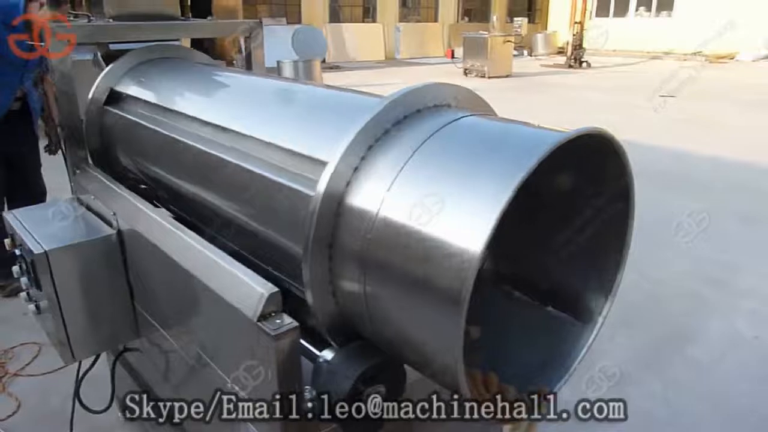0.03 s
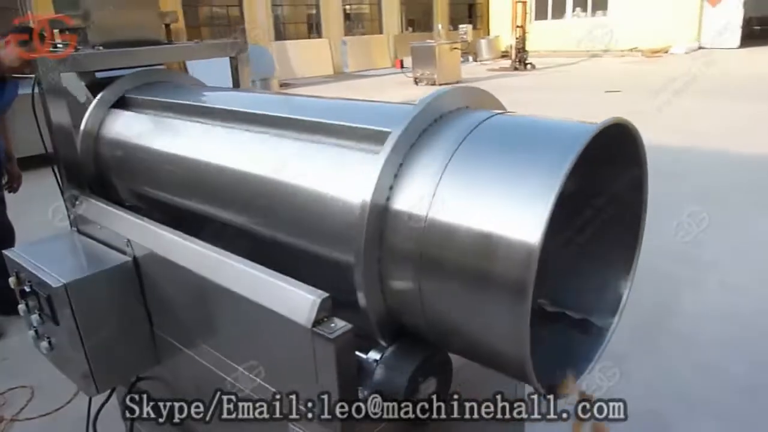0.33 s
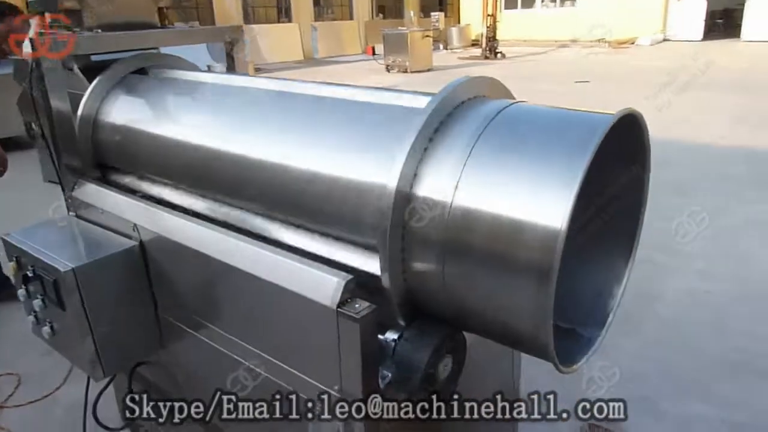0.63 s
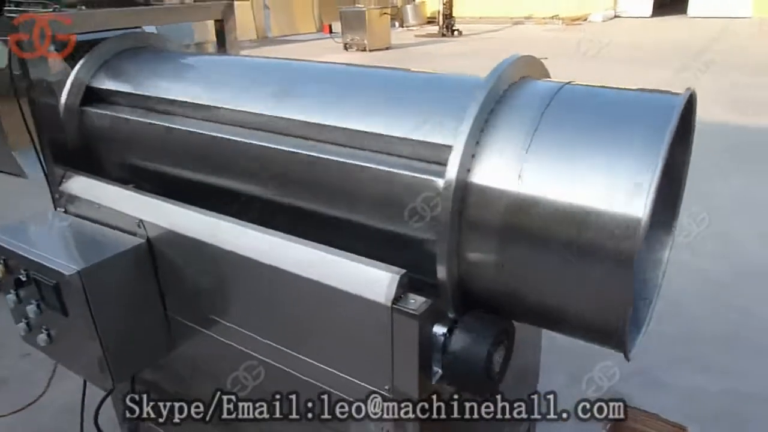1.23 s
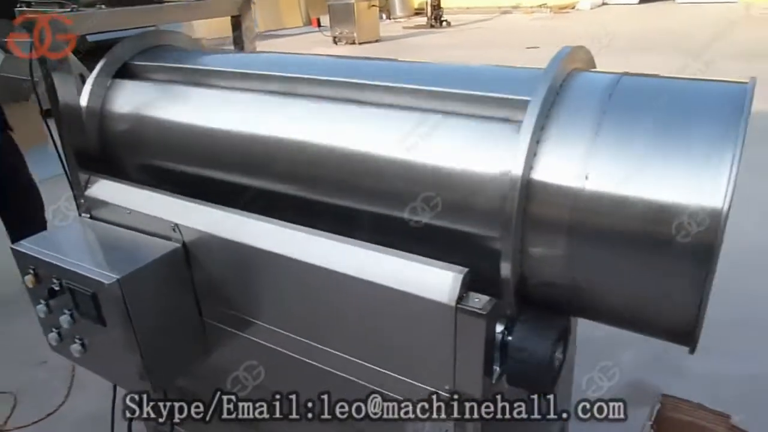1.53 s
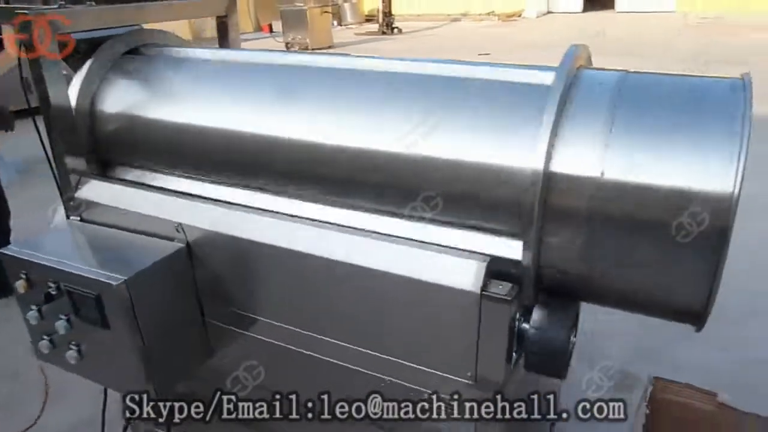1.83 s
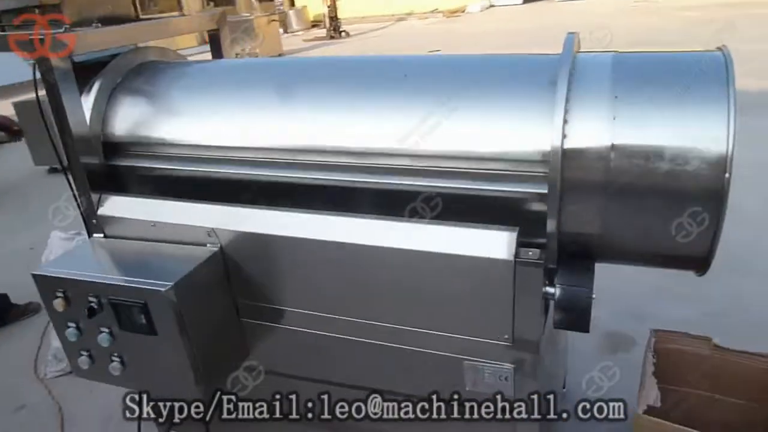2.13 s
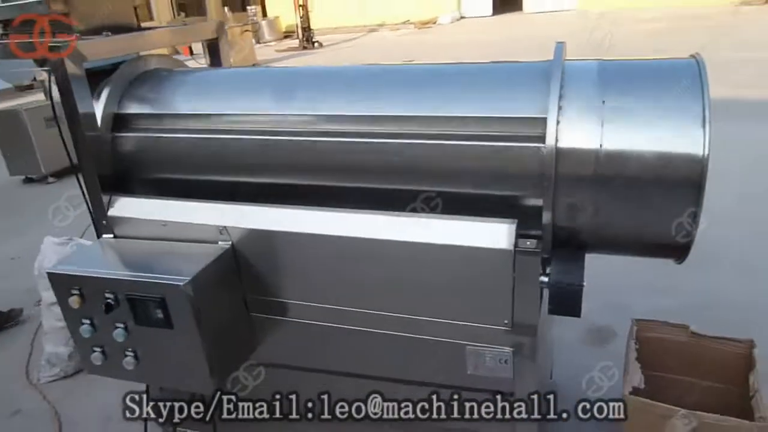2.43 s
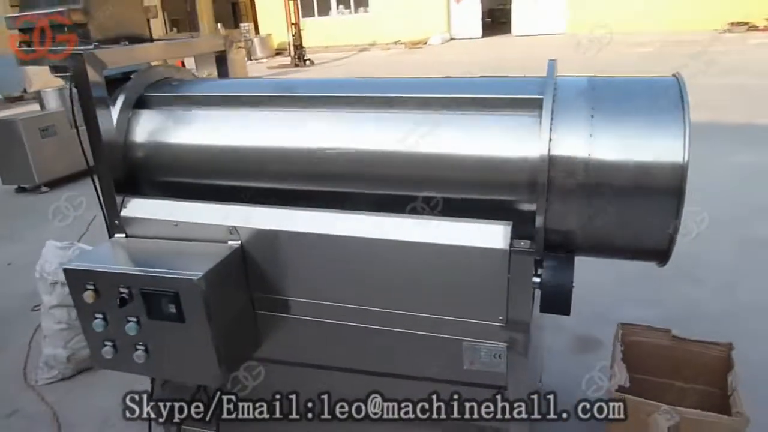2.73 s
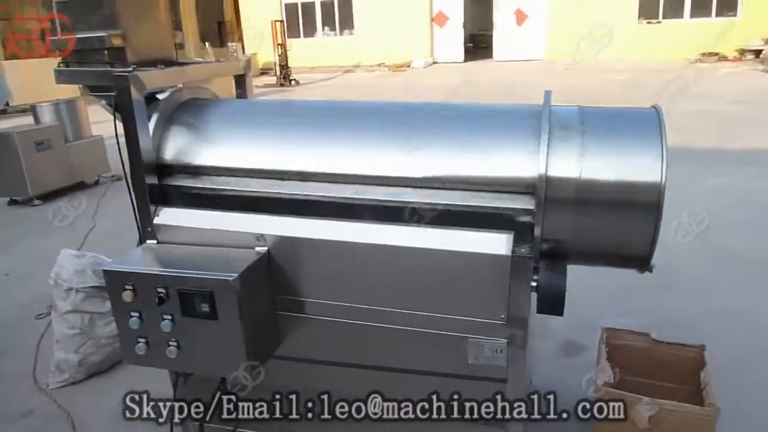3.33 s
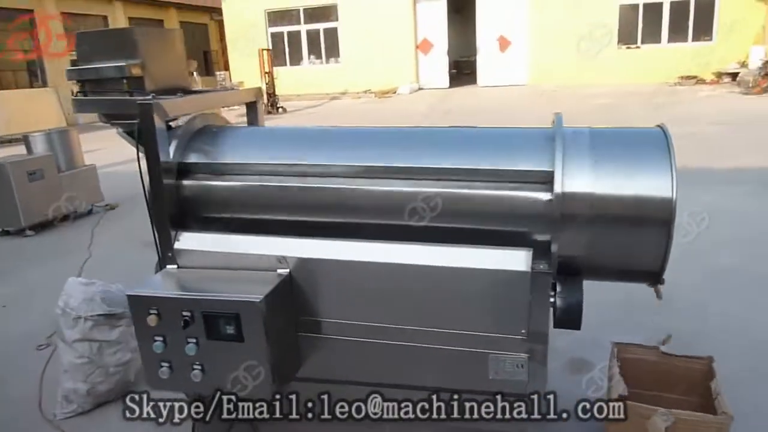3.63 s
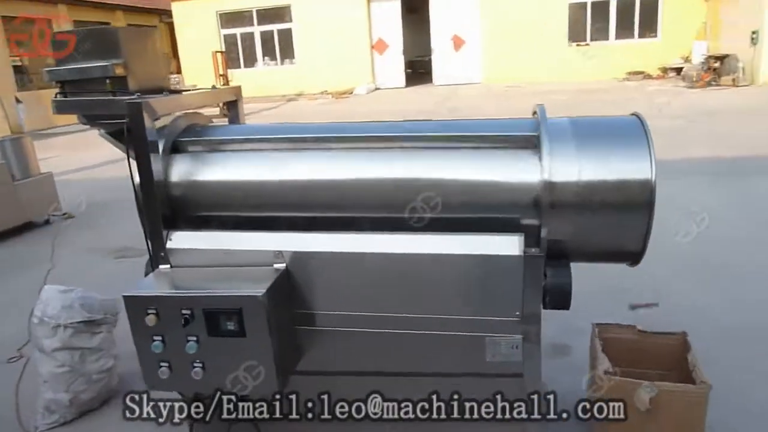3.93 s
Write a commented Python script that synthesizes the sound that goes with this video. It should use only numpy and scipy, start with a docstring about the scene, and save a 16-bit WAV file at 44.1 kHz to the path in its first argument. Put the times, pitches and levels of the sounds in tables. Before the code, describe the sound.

A large steel drum turns on rollers throughout, close by, with a low motor hum, hollow rumble and pulsing metallic grinding. It judders just before 1 second. From about 1.2 to 1.7 seconds the drive clanks and rasps quickly, with two tiny squeaks. From 2 seconds on, the rubbing rim gives brief ringing tones and light scrapes, with single metal ticks near 2.5, 3 and 3.7 seconds.

```python
"""A steel drum turning on rubber rollers in an open yard, on one microphone about a metre away.
The drive, probably a chain, repeats about ten times a second: it hums in the frame and shakes the
drum, which booms. The rolling rim grinds, judders, drags and sings, and sets the thin wall ringing.
For half a second the drive clanks and rasps on every link and squeaks twice; later it only ticks."""
import sys
import numpy as np
from scipy import signal
from scipy.fft import rfft, irfft
from scipy.io import wavfile

SR = 44100
rng = np.random.default_rng(int(sys.argv[2]) if len(sys.argv) > 2 else 0)


def wrap_up_sound(samples):
    """Save the sound to the file named by the first command line argument, as 16-bit audio."""
    columns = np.atleast_2d(samples).T
    # keep every value between -1 and 1, then stretch to whole-number steps
    tamed = np.clip(columns, -1, 1)
    steps = np.round(tamed * 32767).astype(np.int16)
    wavfile.write(sys.argv[1], SR, steps)


N = 176400
T = np.arange(N) / SR
FREQS = np.fft.rfftfreq(N, 1 / SR)
LINK_HZ, FIRST_CATCH_S = 10.48, 1.22  # chain links per second, and when the first one catches

# rise and fall of the drum's boom (time [s], gain [dB])
BOOM_GAIN = [(0, -3.5), (.33, -5.5), (.47, 1.5), (.97, 3), (1.08, -1.5), (1.78, -2), (1.88, 4),
             (2.15, -0.5), (2.5, 3), (2.72, -2), (3.1, 5.5), (3.42, 0.5), (4, 0.5)]
# modes of the thin wall (frequency [Hz], width [Hz], relative level [dB])
WALL_MODES = [(1171, 25, 3.5), (1286, 15, 1.5), (1555, 26, -2), (1710, 81, -5), (1879, 68, -5.5),
              (2570, 31, -13), (3430, 42, -15), (5190, 43, -26.5)]
# spectrum of a link's scrape or crack (frequency [Hz], relative level [dB])
LINK_SPECTRUM = [(400, -4.5), (700, -2.5), (1300, 14.5), (1800, 2), (2300, 4), (3200, 2), (4100, -2),
                 (4800, -17), (6300, -20.5), (7500, -35)]


def undb(db):
    """Decibels to gain."""
    return 10 ** (np.asarray(db) / 20)


def unit(x):
    """Scale to rms 1."""
    return x / np.sqrt(np.mean(x ** 2))


def curve(rows):
    """Gain along rows of (time [s], level [dB])."""
    return undb(np.interp(T, *np.array(rows).T))


def swells(rows):
    """Gain of smooth swells from rows of (peak time [s], half length [s], level [dB])."""
    return sum(undb(db) * np.exp(-((T - peak) / half) ** 2) for peak, half, db in rows)


def burst(start, hold_s, decay_s):
    """Envelope with a 1 ms attack, a hold and an exponential release."""
    age = T - start
    return np.clip(age / .001, 0, 1) * np.exp(-np.maximum(age - hold_s, 0) / decay_s)


def drift(rate_hz):
    """Smooth random drift with spread 1."""
    lowpass = np.exp(-(FREQS / rate_hz) ** 2) * (FREQS > 0)
    return unit(irfft(rfft(rng.standard_normal(N)) * lowpass, N))


def dying_noise(t60_s):
    """A quarter second of noise that falls 60 dB in t60_s."""
    age = T[:SR // 4]
    return rng.standard_normal(len(age)) * np.exp(-np.log(1000) * age / t60_s)


def colour(x, spectrum):
    """Filter by rows of (frequency [Hz], relative level [dB]), to rms 1."""
    hz, db = np.array(spectrum).T
    gain = undb(np.interp(np.log(FREQS + 1), np.log(hz), db))
    return unit(irfft(rfft(x) * gain, N))


def ring(x, modes):
    """Drive damped resonances, each radiating only near its own pitch, to rms 1."""
    s = 1j * FREQS
    body = 0
    for k, (hz, width, db) in enumerate(modes):
        radiation = 2 * hz * s / (s + hz) ** 2
        resonance = s * width / (s ** 2 + s * width + hz ** 2)
        body = body + (-1) ** k * undb(db) * radiation * resonance
    return unit(irfft(rfft(x) * body, N))


def band(x, hz, width_hz):
    """One resonance applied twice, for steep sides."""
    mode = [(hz, width_hz, 0)]
    return ring(ring(x, mode), mode)


def contacts(per_s, spread_db):
    """Dense tiny impacts of uneven size."""
    hits = (rng.random(N) < per_s / SR) * rng.choice([-1, 1], N)
    return unit(hits * undb(spread_db * rng.standard_normal(N)))


def steel(x):
    """The sheet's countless higher modes add a short metallic wash to every contact."""
    tail = dying_noise(t60_s=.088)
    wash = irfft(rfft(x) * rfft(tail / np.linalg.norm(tail), N), N)
    return unit(x + undb(-6) * wash)


def throb(depth, decay_s=.027):
    """The load jumps as each link engages, then relaxes."""
    age = (T - FIRST_CATCH_S) % (1 / LINK_HZ)
    return 1 + depth * np.exp(-age / decay_s)


def snags(per_s=30, depth=.45, decay_s=.022):
    """Random small grips make the friction jump, then relax."""
    jumps = (rng.random(N) < per_s / SR) * rng.random(N)
    return 1 + depth * signal.lfilter([1], [1, -np.exp(-1 / (decay_s * SR))], jumps)


def frame():
    """The rolling load shakes the frame."""
    # the frame's deep shudder (time [s], level [dB])
    shudder_level = [(0, -43.5), (.4, -32), (.95, -46), (1.9, -37), (2.3, -43.5), (3.2, -35.5), (4, -36)]
    return band(rng.standard_normal(N), hz=119.6, width_hz=120) * curve(shudder_level)


def drive():
    """The drive hums on harmonics of the link rate; motor and gears sustain tones in the drum."""
    # hum of the drive (harmonic [multiple of the link rate], level [dB])
    harmonics = [(8, -47), (10, -50.5), (11, -49.5), (13, -43), (15, -39), (17, -41.5)]
    # drone of the frame, resonating on the 18th harmonic (time [s], level [dB])
    drone_level = [(0, -25), (.5, -25), (1.0, -36), (1.3, -25), (1.8, -35.5), (2.25, -29), (2.7, -38),
                   (3.5, -29), (4, -34.5)]
    # motor and gear tones (frequency [Hz], level before the boom's gain [dB])
    motor_tones = [(255.6, -28), (267.7, -33), (276.2, -37.5), (283.5, -28.5), (310.5, -32)]
    speed = 1 + .002 * drift(1.22)
    phase_per_hz = 2 * np.pi * np.cumsum(speed) / SR

    def tone(hz, db, waver_db):
        """A sine that follows the drive's speed and wavers in level."""
        amplitude = np.sqrt(2) * undb(db) * unit(undb(waver_db * drift(4.4)))
        return amplitude * np.sin(hz * phase_per_hz + 2 * np.pi * rng.random())

    hum = sum(tone(k * LINK_HZ, db, waver_db=4.5) for k, db in harmonics)
    drone = curve(drone_level) * tone(18 * LINK_HZ, 0, waver_db=2)
    motor = sum(tone(hz, db, waver_db=4) for hz, db in motor_tones)
    return hum + drone + curve(BOOM_GAIN) * motor


def squeaks():
    """Steel slips on steel with a short, rough squeak."""
    # slips (time [s], frequency [Hz], level [dB])
    slips = [(1.209, 3920, -28.5), (1.594, 5180, -38)]
    out = np.zeros(N)
    for start, hz, db in slips:
        squeak = band(rng.standard_normal(N), hz, width_hz=520)
        out += undb(db) * burst(start, hold_s=0, decay_s=.014) * squeak
    return out


def rasps():
    """A catching link scrapes briefly and rattles the wall."""
    # links that catch (time [s], force level [dB], hold [s])
    catches = [(1.22, -31, 0.016), (1.298, -25, .03), (1.395, -25, .035), (1.491, -26, 0.027),
               (1.586, -24.5, 0.051)]
    force = sum(undb(db) * burst(start, hold, decay_s=.018) for start, db, hold in catches)
    friction = force * contacts(per_s=8000, spread_db=5)
    scrape = colour(steel(friction), LINK_SPECTRUM)
    rattle = ring(friction, WALL_MODES)
    return undb(-3.5) * np.std(friction) * (scrape + rattle)


def clanks():
    """A link snaps home: a hard crack of steel that sets the wall ringing."""
    # blows of a link on its sprocket, and rebounds (time [s], level [dB])
    blows = [(1.208, -27.5), (1.249, -27.5), (1.306, -25), (1.401, -25.5), (1.441, -24.5), (1.497, -28.5),
             (1.51, -31.5), (1.595, -28.5), (2.488, -30), (3.02, -28.5), (3.732, -34.5)]
    out = np.zeros(N)
    for start, db in blows:
        noise = dying_noise(t60_s=.06)
        blow = np.pad(noise, (round(start * SR), N))[:N]
        crack = colour(blow, LINK_SPECTRUM)
        wall = undb(-7) * ring(blow, WALL_MODES)
        out += undb(db) * np.std(blow) * (crack + wall)
    return out


def rim_song(q=90):
    """As the drum turns, the rubbing rim bows one mode after another."""
    # bowed modes (peak time [s], half length [s], frequency [Hz], level [dB])
    notes = [(2.02, 0.34, 465.2, -28), (2.38, .12, 666, -30.5), (3.06, .16, 1183, -31),
             (3.78, .1, 388.4, -23.5)]
    out = np.zeros(N)
    for peak, half, hz, db in notes:
        bowing = contacts(per_s=2200, spread_db=2)
        out += swells([(peak, half, db)]) * band(bowing, hz, width_hz=2 * hz / q)
    return out


def rim_judder(steady_db=-29):
    """The drum rings like a hollow tube, louder when the uneven rim judders on a roller."""
    # hollow modes of the tube (frequency [Hz], width [Hz], relative level [dB])
    tube_modes = [(437.5, 15, 2), (472.5, 8, -4.5), (541, 11, -5), (576.7, 27, -2.5), (667, 18, -2),
                  (707, 16, -7.5), (826, 28, -11.5)]
    # judders (peak time [s], half length [s], level [dB])
    judders = [(.04, 0.06, -34), (.63, .03, -28), (.86, 0.047, -20.5), (1.603, .018, -25),
               (2.07, .11, -24.5), (2.92, .05, -23)]
    hollow = ring(contacts(per_s=1200, spread_db=2), tube_modes)
    return np.hypot(undb(steady_db), swells(judders)) * hollow


def rim_drag():
    """The rim drags along a roller with a bright scrape."""
    # drags (peak time [s], half length [s], level [dB])
    drags = [(.03, .04, -39), (2.235, 0.024, -37.5), (2.305, 0.038, -39), (2.69, 0.021, -39),
             (3.28, 0.1, -41.5)]
    return swells(drags) * band(contacts(per_s=3900, spread_db=.5), hz=2920, width_hz=1370)


def rim_grind():
    """The rim grinds over the rollers and the thin wall rings, both pulsing with the links."""
    # hiss of the rolling rim (frequency [Hz], relative level [dB])
    hiss_spectrum = [(500, -8), (950, 5), (1800, 5.5), (2150, -2), (2650, -1), (3600, -8.5), (4300, -12),
                     (5300, -19.5), (6400, -28), (7300, -48)]
    # course of that hiss (time [s], level [dB])
    hiss_level = [(0, -28), (.27, -34), (.56, -33.5), (.62, -31), (.9, -38.5), (1.07, -31.5), (1.18, -33),
                  (1.7, -31.5), (2.05, -37), (2.42, -34.5), (2.65, -31.5), (2.85, -34), (3.5, -35),
                  (4, -34)]
    # rise and fall of the wall's ringing (time [s], gain [dB])
    wall_gain = [(0, 1), (.9, -1.5), (1.6, 3), (2.1, -1.5), (2.7, 3.5), (3.07, 8), (3.4, -2), (3.8, 5.5),
                 (4, 0.5)]
    grit = contacts(per_s=12000, spread_db=4.5) * throb(depth=.43) * snags()
    taps = contacts(per_s=2400, spread_db=2) * throb(depth=.36)
    hiss = colour(steel(grit), hiss_spectrum) * curve(hiss_level)
    wall = ring(taps, WALL_MODES) * curve(wall_gain) * undb(-37.5)
    return hiss + wall


def drum(waver_db=2):
    """Small knocks from the drive make the drum boom over a broad rolling rumble."""
    # low modes of the drum and its frame (frequency [Hz], width [Hz], relative level [dB])
    low_modes = [(135.1, 11, -12.5), (265.6, 6.6, -2), (274.6, 9, -6), (301.1, 13, -4.5), (315.2, 8, -4),
                 (339, 6, -1.5), (387.1, 6, -4.5), (414.8, 5, -7.5)]
    # rolling rumble (frequency [Hz], relative level [dB])
    rumble_spectrum = [(20, -59), (38, -46), (100, -22.5), (160, -6), (220, -2), (330, -5), (520, -6.5),
                       (760, -7), (980, -15), (1400, -29), (2500, -67.5)]
    # course of that rumble (time [s], level [dB])
    rumble_level = [(0, -23), (.5, -22), (1.05, -22.5), (1.35, -22), (1.75, -25), (2.1, -22.5), (2.4, -27),
                    (3.0, -24), (3.4, -26.5), (4, -25.5)]
    knocks = contacts(per_s=900, spread_db=1) * throb(depth=.24)
    boom = np.zeros(N)
    for k, (hz, width, db) in enumerate(low_modes):
        gain = undb(db + waver_db * drift(2.1))  # each mode swells and fades as the drum turns
        boom += (-1) ** k * gain * np.sqrt(width) * ring(knocks, [(hz, width, 0)])
    rumble = colour(steel(contacts(per_s=3000, spread_db=4)), rumble_spectrum)
    return unit(boom) * curve(BOOM_GAIN) * undb(-25) + rumble * curve(rumble_level)


def scene():
    """The whole machine from about a metre away, in mono."""
    body = drive() + drum() + frame()
    rim = rim_grind() + rim_judder() + rim_drag() + rim_song()
    chain = rasps() + clanks() + squeaks()
    return (body + rim + chain)[None]


def record(dry):
    """The recorder cuts the treble steeply above 7.2 kHz."""
    return signal.sosfilt(signal.ellip(8, .2, 70, 7200, fs=SR, output="sos"), dry)


dry = scene()
out = record(dry)
wrap_up_sound(out)
```